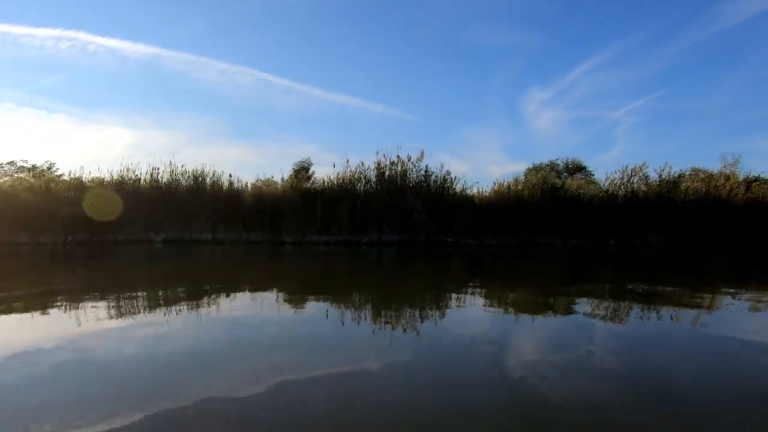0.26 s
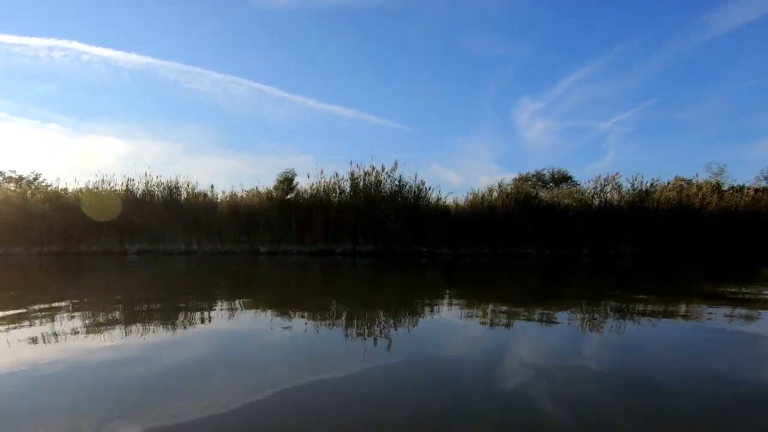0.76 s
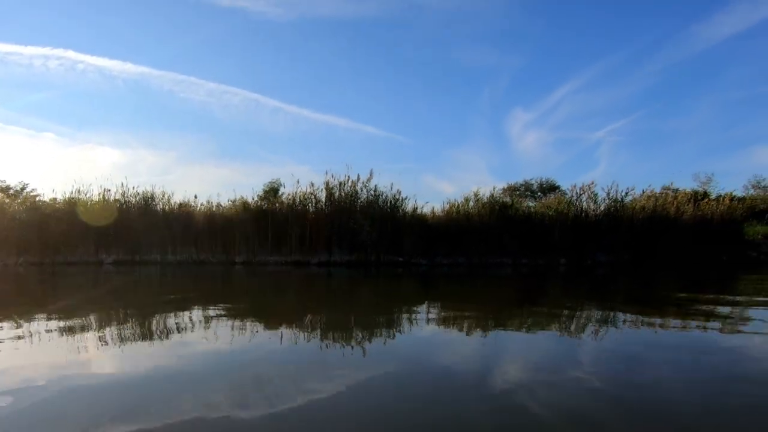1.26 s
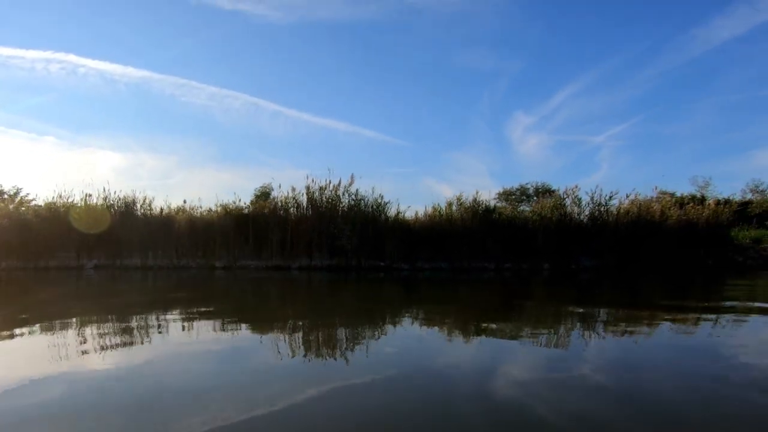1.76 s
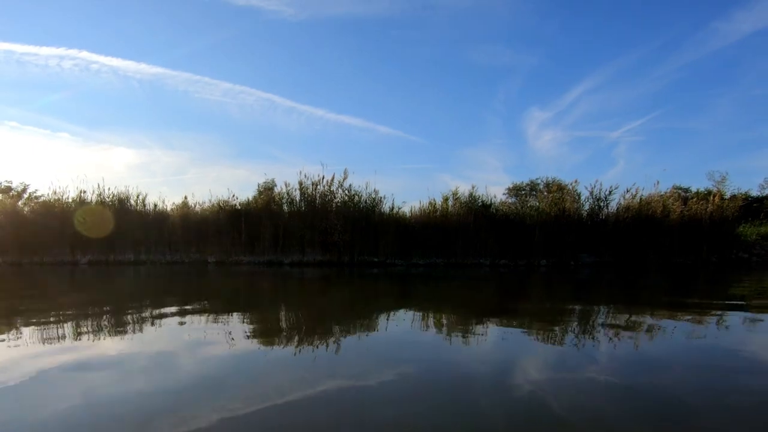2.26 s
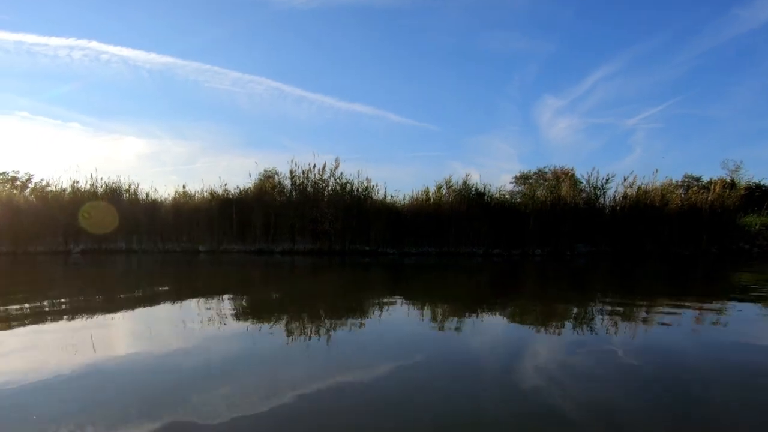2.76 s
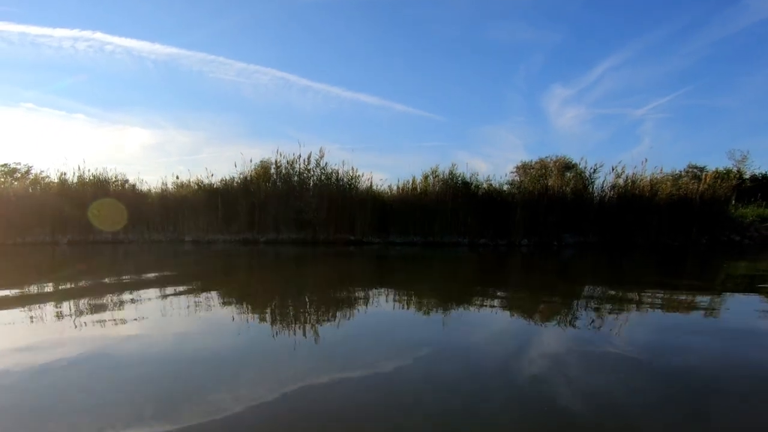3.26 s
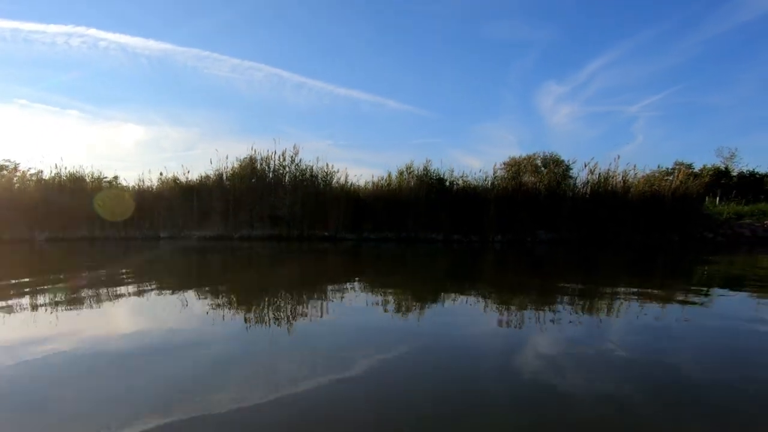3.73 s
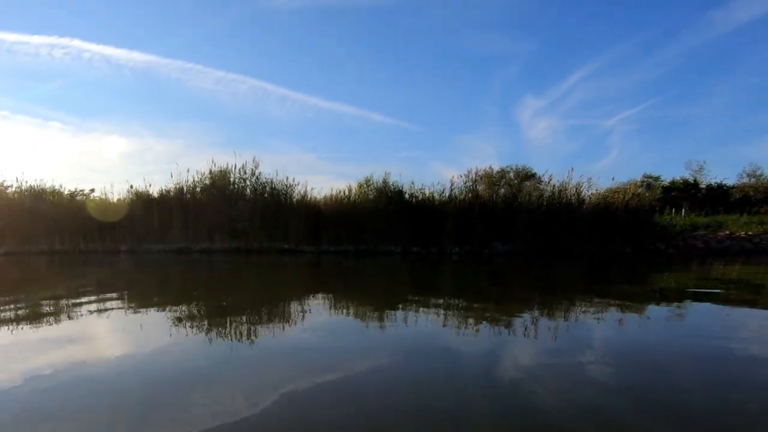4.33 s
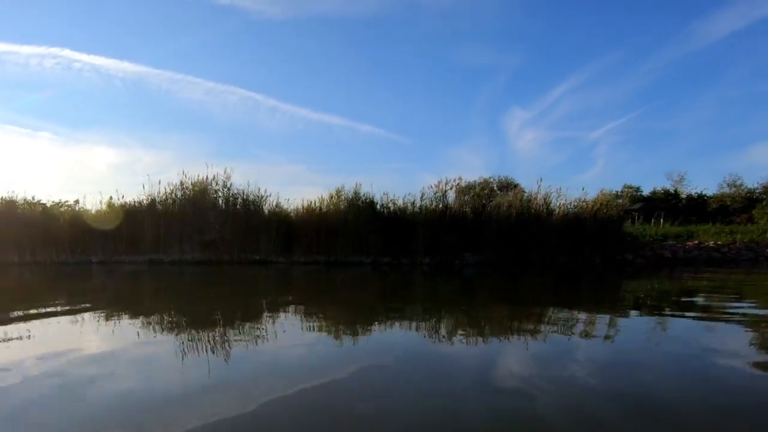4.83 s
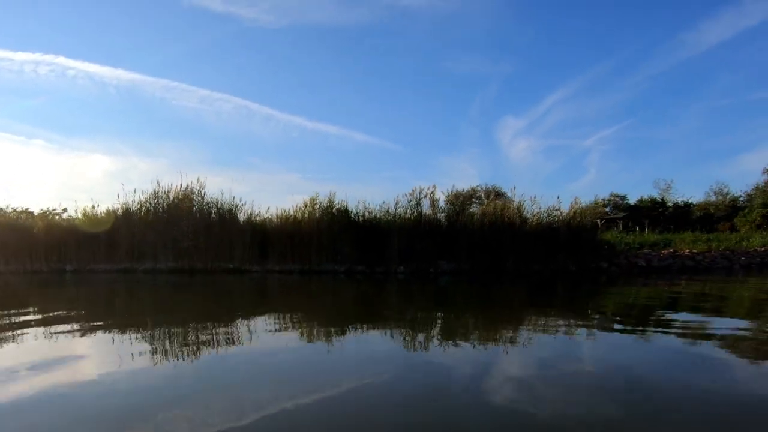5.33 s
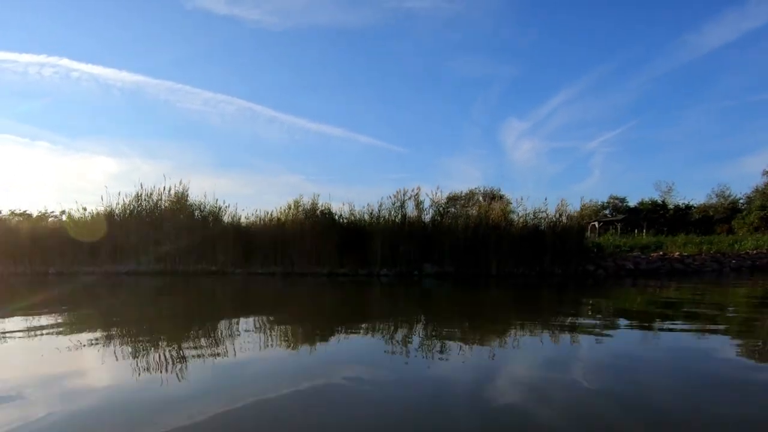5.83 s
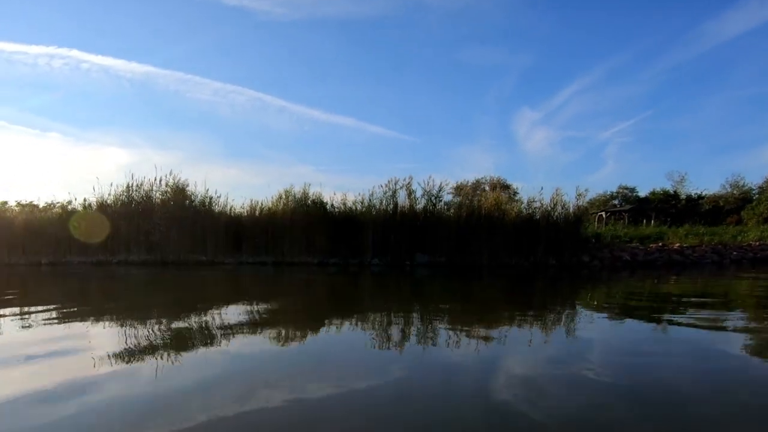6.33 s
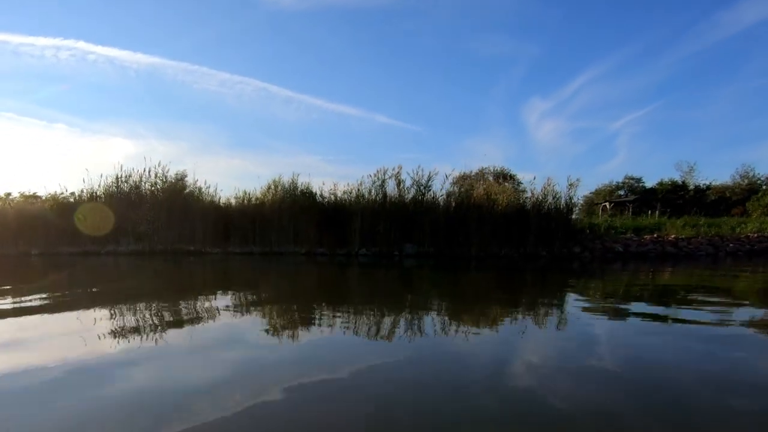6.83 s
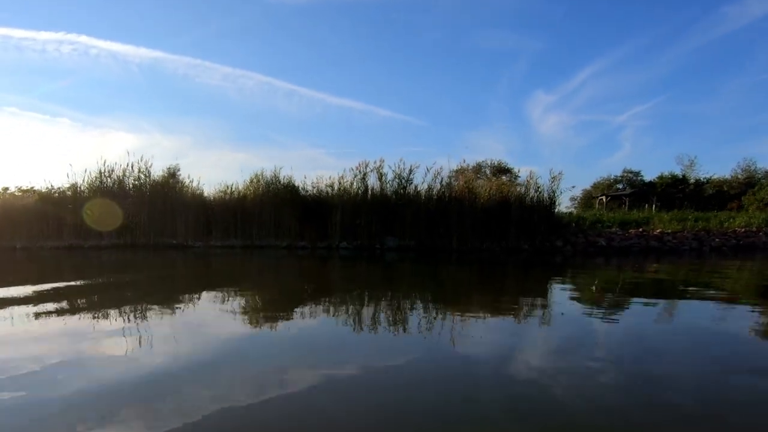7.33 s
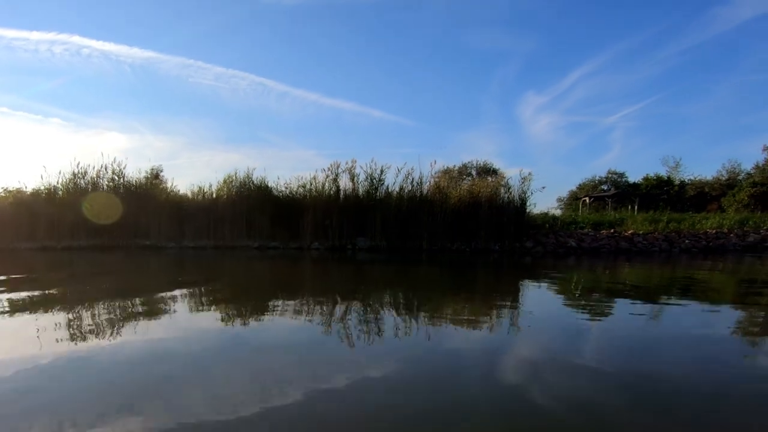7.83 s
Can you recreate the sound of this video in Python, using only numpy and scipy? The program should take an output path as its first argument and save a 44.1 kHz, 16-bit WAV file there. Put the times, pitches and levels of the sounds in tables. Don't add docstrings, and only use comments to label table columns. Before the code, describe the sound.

Close paddle strokes on a quiet lake: plops, ringing bubbles and fine spray, one hard slap late, low wind buffeting and faint engine throb beneath.

```python
import sys
import numpy as np
from scipy import signal
from scipy.fft import rfft, irfft, next_fast_len
from scipy.io import wavfile
from scipy.ndimage import uniform_filter1d, map_coordinates

SR = 44100
rng = np.random.default_rng(int(sys.argv[2]) if len(sys.argv) > 2 else 0)


def volts_from_decibels(level):
    exponent = np.asarray(level, float) / 20
    return 10 ** exponent


def file_out(sig):
    cols = np.atleast_2d(sig).T
    lim = np.clip(cols, -1, 1)
    pcm = np.round(lim * 32767).astype(np.int16)
    wavfile.write(sys.argv[1], SR, pcm)


N = 356769

# peak_s, peak_db, rise_s (per 20 dB), fall_s (per 20 dB)
STROKES = [(0, -55.5, .1, 1.28), (.34, -58.5, 0.02, -0.32), (1.53, -59, 0.63, 0.38), (1.99, -58, 0, 0.5),
           (2.2, -54.5, 0.36, 0.26), (3.11, -65.5, -0.22, 1.23), (3.63, -58.5, 0.12, 1.9),
           (4.02, -53, 0.6, 0.33), (4.37, -68, -21, 0.5), (4.78, -63.5, 0.39, 0.64),
           (5.15, -57, -0.02, 0.05), (5.22, -52, 0.25, 0.17), (5.33, -58, 0.07, 0.16),
           (5.89, -63, 0.43, 0.18), (6.04, -53.5, 0.59, 0.38), (6.41, -61, 0.2, 0.3),
           (6.65, -65.5, 0.2, 0.35), (6.78, -60, 0.26, 0.34), (7.24, -60, 0.05, 0.26), (7.89, -56, 1, 0.47)]
# pitch_hz, level_db (per Hz)
SWISH_COLOUR = [(300, 3.5), (700, -10.5), (1300, 5.5), (2000, -3), (3400, -19.5), (8000, -22), (10500, -46),
                (15000, -56)]
# start_s, peak_db, fade_s (by 60 dB), brightness_db (per octave), left_right_db
SPLATS = [(0.453, -38, 0.21, 0, 1.5), (0.653, -48.5, 0.11, -3.5, 21), (1.05, -38.5, 0.12, 0.5, 9),
          (1.466, -37.5, 0.13, -15, 3), (1.971, -35.5, 0.25, -6, -2.5), (2.719, -58.5, 0.36, 9, 7),
          (3.373, -31.5, 0.076, -6, 2), (3.51, -35, 0.11, -6, 0), (3.934, -30.5, 0.059, -13, 1),
          (4.005, -31, 0.17, -18, 5), (4.783, -43, 0.083, -3.5, 24), (5.127, -45, 0.32, -0.5, 5),
          (5.197, -42.5, 0.24, -3.5, 10), (5.333, -41, 0.19, -2, 0), (5.729, -41.5, 0.17, 8, -1),
          (5.83, -43, 0.095, -3, 20.5), (6.751, -17, 0.095, -3, 0.5), (7.32, -32.5, 0.026, -23, 1),
          (7.496, -36.5, 0.18, -5.5, -1)]
# pitch_hz, level_db (per Hz)
SPLAT_COLOUR = [(200, -0.5), (600, 6), (1500, 11.5), (2500, 6), (5000, -5.5), (9000, -9.5), (11000, -55),
                (15000, -56)]
# start_s, peak_db, pitch_hz, left_right_db
BUBBLES = [(0.029, -35, 2060, -15.5), (0.069, -42, 1825, -18.5), (.072, -34.5, 717, -9),
           (3.935, -39.5, 2650, 18), (0.449, -35, 1297, -2), (1.665, -36.5, 1417, -15),
           (1.679, -35.5, 1460, -12), (2.139, -22, 1322, -6.5), (2.309, -42.5, 1370, 17),
           (3.132, -45, 1417, 15), (3.498, -38, 1230, 0), (3.834, -39, 1570, -1), (3.934, -39.5, 957, 13),
           (3.934, -38, 1510, 18), (4.004, -31.5, 1540, 14), (4.034, -41, 1250, -12),
           (4.389, -34.5, 1400, -2), (5.219, -34, 1056, 3), (5.247, -33, 1525, -3),
           (5.766, -31.5, 1110, -3), (5.984, -34, 1050, 19), (6.047, -31.5, 2210, 26),
           (6.077, -37.5, 1310, 19), (6.211, -37, 1366, 8), (6.764, -32, 1327, 10), (7.752, -41, 1240, -16),
           (7.799, -33, 1415, -4), (1.699, -45, 3070, 4)]
# start_s, peak_db, pitch_hz, left_right_db
GULPS = [
    (.044, -43, 409, 13),
    (1.463, -35, 370, 0.5),
    (2.158, -39, 538, 2.5),
    (3.373, -39, 278, -1),
    (3.996, -33.5, 313, 1),
    (3.998, -39.5, 712, 22),
    (4.786, -36, 479, 1),
    (6.162, -45, 713, -5),
    (7.227, -37.5, 468, 10),
    (7.672, -38, 698, 6),
]
# start_s, peak_db, pitch_hz
DRIPS = [(0.522, -45, 2450), (.542, -45.5, 2270), (0.745, -51.5, 2430), (0.815, -45.5, 1310),
         (0.941, -46, 980), (1.511, -47, 1235), (1.762, -48, 1464), (1.92, -47, 1030), (2.957, -53.5, 2600),
         (4.888, -50.5, 2270), (3.735, -44, 3230), (3.816, -43.5, 1690), (4.183, -54, 1600),
         (4.182, -34, 2250), (4.341, -39, 2260), (4.356, -34, 1920), (4.948, -46, 2420), (5.622, -47, 1920),
         (5.649, -48, 1520), (6.162, -47.5, 2800), (6.244, -45.5, 2040), (6.387, -44, 1750),
         (6.448, -45, 2210), (7.409, -46, 1940), (7.83, -51, 1460), (4.837, -52, 2160)]
# start_s, peak_db, pitch_hz
TRICKLE = [(.078, -40, 1470), (.545, -38.5, 1410), (.585, -44, 650), (4.787, -38.5, 694), (.915, -49, 965),
           (.918, -46, 1530), (1.518, -50, 1850), (1.57, -44, 1730), (2.763, -59, 1680),
           (3.292, -41.5, 1040), (3.495, -44, 2050), (3.838, -43, 900), (6.653, -45, 1550),
           (5.765, -41.5, 810), (5.695, -48, 400), (5.828, -36, 1560), (7.333, -46, 1244), (7.42, -48, 767),
           (7.701, -37.5, 1240), (7.819, -42, 1780)]
# start_s, peak_db, pitch_hz, left_right_db
TICKS = [(0.171, -44.5, 4650, 2.5), (0.266, -45.5, 4860, 4), (0.2993, -45, 8540, 0),
         (0.347, -39.5, 7040, 4), (0.378, -50, 4200, 16), (0.5566, -52.5, 6400, 8), (1.4142, -49, 5400, -3),
         (2.1316, -50.5, 5410, 14), (2.2184, -45, 5530, 6), (2.4562, -50.5, 5160, 9),
         (3.057, -47.5, 4230, 0.5), (3.918, -49, 4650, -8), (3.951, -48, 6100, -16), (4.0206, -45, 4640, 7),
         (4.0512, -51, 4650, 3), (4.132, -44.5, 6760, 5), (4.2864, -48, 5800, 5), (4.6417, -56, 5270, 6),
         (4.7423, -52, 5290, 6), (5.0973, -47, 5140, 3), (5.683, -46, 4320, -2), (5.8007, -46, 4350, 5),
         (5.82, -41, 5530, -5), (5.9723, -55, 4470, 3), (7.695, -53, 4320, -3.5), (7.7195, -48, 7630, -0.5),
         (7.8424, -46, 4200, 8), (7.874, -48, 8690, 3.0)]
# pitch_hz, level_db (per Hz)
SPRAY_COLOUR = [(800, -5.5), (2500, -7), (6000, -11.5), (9500, -9.5), (11000, -16), (15000, -21)]
# start_s, peak_db, pitch_hz, left_right_db
FAT_DROPS = [
    (2.2034, -23, 2200, 27),
    (2.716, -37.5, 3470, 19),
    (3.133, -43, 1900, 24),
    (6.047, -22.5, 2420, 27.5),
    (6.0752, -27, 2690, 23),
    (7.902, -28.5, 2850, 24),
]
# start_s, peak_db, pitch_hz
PINGS = [(0.3306, -54, 3590), (0.35, -42, 3060), (0.4923, -49, 2410), (0.5094, -50.5, 2700),
         (0.6315, -49, 3000), (1.0216, -52, 2730), (1.056, -41, 3260), (1.2974, -50, 3000),
         (1.31, -48, 3400), (1.3319, -46.5, 2480), (1.4017, -45, 2820), (1.4361, -49, 2600),
         (2.2503, -36.5, 3070), (2.3885, -47, 3110), (2.5192, -53, 2690), (3.2066, -51, 2600),
         (3.9494, -40, 2800), (3.9848, -49, 2890), (4.0277, -48, 2630), (4.0397, -37, 2730),
         (4.0512, -34, 2530), (4.12, -38, 2680), (4.6778, -45.5, 3400), (5.1098, -48, 2880),
         (5.1277, -40, 2800), (5.139, -46, 2870), (5.9823, -38.5, 3270), (6.3455, -58, 3230),
         (6.668, -52, 2800), (6.7364, -55, 2450), (7.0648, -49, 3160), (7.0988, -49, 2460),
         (7.856, -49, 3000), (7.931, -44, 3220), (7.9583, -45, 3060), (8.0142, -47, 3110),
         (1.054, -39, 1390), (3.095, -47, 1460), (3.375, -44, 1960), (.918, -57, 2460)]
# start_s, peak_db, pitch_hz, left_right_db
POPS = [(0.3137, -43, 1570, 12), (0.3484, -42.5, 1780, 16), (0.379, -43.5, 1950, 14),
        (0.4302, -40, 2400, -7.5), (0.6579, -40, 1960, -10), (2.2027, -31.5, 1250, 19),
        (5.139, -51, 1430, -2), (7.669, -39, 2230, 0), (7.933, -44, 1300, 7), (7.998, -42, 2070, 7),
        (2.2342, -36.5, 1680, 12), (3.318, -50.5, 1510, -12), (3.4266, -49, 1860, 8),
        (3.478, -48.5, 2580, -17), (7.422, -48, 2780, -14), (4.132, -43, 1910, 16), (5.2954, -43, 2280, 4),
        (5.7014, -44, 2010, -9), (5.904, -44.5, 1780, 16)]
# start_s, peak_db, pitch_hz
FLECKS = [(0.2124, -63, 4730), (0.5003, -60, 4560), (1.1777, -58, 4460), (2.2458, -59, 4230),
          (2.3027, -49, 4990), (2.4165, -57, 5550), (2.7077, -44, 4270), (3.201, -50, 4730),
          (3.5813, -50, 4770), (3.6177, -51, 4700), (3.6416, -53, 4770), (3.6905, -51, 4730),
          (4.119, -47, 6700), (4.2055, -54, 6700), (4.2393, -56, 5050), (4.451, -50, 5730),
          (5.0814, -58, 5100), (5.2064, -47.5, 4970), (5.2245, -51, 5760), (5.2984, -49, 5430),
          (6.0102, -55, 5920), (6.0438, -30.5, 5300), (6.202, -58, 5620), (6.214, -52, 5200),
          (6.31, -49, 4330), (6.3929, -49.5, 9810), (6.7358, -54, 5000), (6.8805, -55, 4660),
          (6.9544, -53, 4740), (7.2799, -54.5, 4140), (7.432, -51, 4380), (7.442, -51, 4960),
          (7.5068, -52, 4230), (7.5194, -48, 4200), (7.5847, -50, 4870), (7.657, -44, 4150),
          (7.7687, -46, 8800), (7.812, -56, 5300), (7.847, -60, 4230), (7.9023, -35.5, 8600),
          (7.9244, -47, 5370), (7.938, -49, 4600), (7.975, -53, 5040), (7.9942, -46.5, 5000)]
# start_s, peak_db, pitch_hz, end_pitch_hz, length_s
CAVITIES = [
    (.08, -44.5, 785, 1110, 0.024),
    (1.91, -56, 993, 1510, 0.022),
    (2.151, -48, 1830, 2690, 0.035),
    (2.235, -51, 980, 1260, 0.039),
    (2.319, -51.5, 1380, 2400, 0.026),
    (3.101, -56, 1440, 2730, 0.025),
    (5.162, -58, 610, 1300, 0.0418),
    (5.164, -58, 1710, 2700, 0.032),
    (5.225, -56, 2520, 3440, 0.014),
    (7.808, -49, 1490, 1914, 0.042),
]
# delay_s, level_db
ECHOES = [
    (.0011, -21),
    (.0027, -17.5),
    (.0052, -15),
]
# peak_s, peak_db, swell_s (per 20 dB, sign unused), left_right_db
GUSTS = [(0.059, -21.5, 0.29, 13.5), (.18, -22, -0.1, 8), (.4, -35.5, 1.1, 6), (.97, -36.5, 0, -1),
         (1.68, -23, 0.36, -6.5), (1.78, -26.5, .1, -3), (2.03, -27.5, -0.17, -2.5), (2.299, -27, 0.27, -6),
         (2.62, -38, 1, 1.5), (3.05, -32, -0.06, -12), (3.31, -24, 0.47, -1.5), (3.47, -31.5, 0.3, 2),
         (3.77, -37, -0.03, 17), (4.25, -37.5, 0.93, 8.5), (4.5, -34, 0.55, 9), (4.74, -24, 0.19, 6),
         (4.9, -40, -2, 11), (5.16, -32.5, 0.5, 0), (5.48, -28, 0.62, 1.5), (5.78, -27.5, .25, -0.5),
         (5.98, -28.5, -0.18, 8), (6.15, -39.5, -0.3, 0), (6.229, -36, 0.27, 12),
         (6.441, -26.5, 0.1152, -4), (7.05, -40.5, 1.3, -4.5), (7.32, -33, 0.26, -1), (7.6, -33, 0.55, 2),
         (7.849, -27, 0.21, 9), (8.0, -56, 2, -2)]
# pitch_hz, level_db (per Hz)
WIND_COLOUR = [(15, -13), (35, 3.5), (70, -0.5), (120, -9.5), (250, -25), (500, -42), (1000, -56.5),
               (3000, -110)]
# time_s, level_db
BREEZE = [(0, -83), (.34, -71.5), (.77, -90), (1.53, -76.5), (2.38, -78.5), (2.65, -70.5), (2.85, -93.5),
          (3.11, -87), (3.63, -75), (4.02, -75.5), (4.37, -92), (4.7, -76.5), (5.04, -93), (5.22, -76),
          (6.04, -78), (6.5, -79.5), (7.35, -81), (7.6, -80), (7.92, -69.5), (8.09, -78.5)]
# pitch_hz, level_db (per Hz)
REED_COLOUR = [(1500, -6), (2600, 1), (4500, -3), (6800, -7), (8000, -1), (9200, 0), (10200, -9),
               (13000, -22)]
# start_s, end_s, pitch_hz, end_pitch_hz, level_db
WHISTLES = [
    (1.51, 1.63, 3000, 4700, -73),
    (2.925, 3.03, 2900, 4650, -72),
    (4.97, 5.08, 2900, 4000, -76),
]
# time_s, engine_db, roar_db
FAR = [
    (0, -42.5, -49),
    (2.5, -47.5, -49.5),
    (5, -53.5, -49.5),
    (6.7, -56, -49),
    (8.09, -50, -47.5),
]
# multiple (of the base pitch), level_db
ENGINE = [(6, 0), (7, -9), (8, -9), (9, -3), (10, -11), (11, -11), (12, -12), (14, -13), (15, -11),
          (17, -12), (19, -13), (20, -12), (21, -15), (22, -15)]
# pitch_hz, level_db (per Hz)
ROAR_COLOUR = [(60, -7.5), (250, -3.5), (500, -11.5), (800, -13), (1200, -18.5), (1650, -37), (2100, -47.5),
               (11000, -55)]
# pitch_hz, level_db
MIC = [(3200, 0.5), (4100, 0.5), (5000, 0.5), (9500, -1.5), (11000, -4.5), (16000, -19)]


def swish():
    sheet = patchy(rush(SWISH_COLOUR, 0.065, 0.0003), depth_db=5.0)
    fizz, t = np.zeros((2, N + SR)), np.arange(900) / SR
    u, *rest = rng.random((5, 2600))
    for s, pitch, size, pan, life in zip(crowded(u, 0.7), *rest):
        hz = 750 * 5.5 ** (pitch ** 1.5)
        cycles = 5 + 45 * life ** 2.6 * (hz < 2300)
        gain = volts_from_decibels(-4.6 * np.log(size + 0.2) - 0.5 * np.log2(hz / 900))
        add(fizz, s, gain * bubble(hz, cycles / hz, 0.16, t), 18 * (pan - 0.45), 0.0003)
    return total(swells(STROKES)) * (volts_from_decibels(4.0) * sheet + unit(fizz[:, :N]))


def splats():
    out, t, rise_s = np.zeros((2, N + SR)), np.arange(SR // 6) / SR, 0.0045
    for s, db, fade_s, tilt_db, pan_db in SPLATS:
        own = rng.standard_normal((3, len(t)))
        pair = np.array([own[0], np.roll(own[0], shift=12)]) + 2.0 * own[1:]
        tilt_db = np.clip(tilt_db, -6, 8)
        pair = filtered(pair, lambda f: volts_from_decibels(along(SPLAT_COLOUR, f) + tilt_db * np.log2(f / 1500 + 0.2)))
        pair = unit(pair)
        low = filtered(pair, lambda f: 1 / (1 + (f / 2800) ** 4))
        fall = volts_from_decibels(-60 * np.maximum(t - rise_s, 0) / max(fade_s, 0.01))
        rough = volts_from_decibels(4.3 * unit(uniform_filter1d(rng.standard_normal(len(t)), size=80)))
        burst = np.minimum(t / rise_s, 1) ** 2 * rough * (low * fall + (pair - low) * fall ** 2.06)
        out[:, round((s - 0.002) * SR):][:, :len(t)] += volts_from_decibels(db - 7.5) * sides(pan_db)[:, None] * burst
    return out[:, :N]


def drips():
    out, t = np.zeros((2, N + SR)), np.arange(SR // 8) / SR
    events = BUBBLES + GULPS + panned(DRIPS, -13) + panned(TRICKLE, 8)
    for s, db, hz, pan_db in events:
        life, rise, lead_s = rng.uniform([0.7, 0.02, 0.00024], [1.15, 0.14, 0.0003])
        fade_s = life * 0.05 * (1500 / hz) ** 0.73
        add(out, s - 0.0007, volts_from_decibels(db + 3.0) * bubble(hz, fade_s, rise, t), pan_db, lead_s)
    return out[:, :N]


def spray():
    out, patter, t = np.zeros((2, N + SR)), np.zeros((2, N + SR)), np.arange(SR // 40) / SR
    thrown = [(s, db - 7.5 + 0.63 * min(tilt_db, 0), None, pan_db) for s, db, _, tilt_db, pan_db in SPLATS]
    flung = [(s, db - 26, None, pan_db / 2) for s, db, _, pan_db in FAT_DROPS]
    for s, db, own_hz, pan_db in TICKS + thrown + flung:
        hz, fade_s, lead_s = rng.uniform([4200, 0.006, 0.00007], [9000, 0.018, 0.0003])
        gain = volts_from_decibels(db - (2.0 if own_hz is None else -3.5))
        add(out, s - 0.0005, gain * crack(own_hz or hz, fade_s, t), pan_db, lead_s)
    u, *rest = rng.random((4, 330))
    for s, pitch, size, pan in zip(crowded(u, 0.62), *rest):
        tick = crack(3000 + 7000 * pitch, 0.0061, t)
        add(patter, s, volts_from_decibels(-3.5 * np.log(size + 0.06)) * tick, 16 * (pan - 0.35), 0.0002)
    return out[:, :N] + volts_from_decibels(-18) * total(swells(STROKES)) * unit(patter[:, :N])


def fat_drops():
    out, t = np.zeros((2, N + SR)), np.arange(SR // 50) / SR
    for s, db, hz, pan_db in FAT_DROPS:
        width_hz = 700 * (3000 / hz) ** 2
        click = 0.12 * rng.standard_normal(len(t)) + (t == t[30])
        push = filtered(click, lambda f: 1 / (1 + ((f - hz) / width_hz) ** 4))
        push = push * volts_from_decibels(-60 * t / 0.0054) * (1 - np.exp(-t / 0.00021))
        add(out, s - 0.0005, volts_from_decibels(db - 6.5) * push / np.abs(push).max(), pan_db, 0.0002)
    return out[:, :N]


def droplets():
    out, t = np.zeros((2, N + SR)), np.arange(SR // 30) / SR
    small, fine = panned(PINGS, 11) + POPS, panned(FLECKS, -2)
    for rows, cycles, speck_db in ((small, 36, -19), (fine, 42, -8)):
        for s, db, hz, pan_db in rows:
            life, rise, lead_s = rng.uniform([0.7, 0.0, 0.00012], [1.3, 0.15, 0.0003])
            ring = bubble(hz, life * cycles / hz, rise, t)
            speck = volts_from_decibels(speck_db) * crack(hz, 0.018, t)
            add(out, s - 0.0007, volts_from_decibels(db + 5.0) * (ring + speck), pan_db, lead_s)
    return out[:, :N]


def cavities():
    out = np.zeros((2, N + SR))
    for s, db, hz, end_hz, length_s in CAVITIES:
        tone = slide(length_s, hz, end_hz, 0.37)
        rough = volts_from_decibels(3.5 * unit(uniform_filter1d(rng.standard_normal(SR // 10), size=120)))[:len(tone)]
        add(out, s, volts_from_decibels(db) * rough * tone, 8.5, 0.00025)
    return out[:, :N]


def wind():
    s, db, width, pan_db = np.transpose(GUSTS)
    rows = np.transpose([s, db, width, width])
    gusts = [total(gain[:, None] * swells(rows)) for gain in sides(pan_db)]
    eddies = volts_from_decibels(4.55 * np.array([wobble(24), wobble(24)])) * rush(WIND_COLOUR, 0.14)
    eddies = eddies / np.sqrt(np.abs(uniform_filter1d(eddies ** 2, size=3000)) + 0.018)
    return gusts * eddies


def reeds():
    breeze_db, = curves(BREEZE)
    return volts_from_decibels(breeze_db + 4.5 + 1.7 * wobble(12)) * rush(REED_COLOUR, 0.037, 0.0001)


def bird():
    out = np.zeros((2, N + SR))
    for s, end_s, hz, end_hz, db in WHISTLES:
        add(out, s, volts_from_decibels(db) * slide(end_s - s, hz, end_hz, 0.39), 1, 0)
    return out[:, :N] * volts_from_decibels(4 * wobble(45) - 10)


def distance():
    engine_db, roar_db = curves(FAR)
    firing_hz = 17.0 * (1 + 0.0015 * wobble(1.29))
    turn = 2 * np.pi * np.cumsum(firing_hz) / SR
    engine = 0
    for k, db in ENGINE:
        phase = rng.uniform(0, 2 * np.pi) + rng.normal(0, 0.6, (2, 1))
        engine = engine + volts_from_decibels(db + 2.5 * wobble(9)) * np.sin(k * turn + phase)
    roar = volts_from_decibels(roar_db + 0.39 * wobble(1.26)) * rush(ROAR_COLOUR, 1.0, 0.00023, apart_hz=151)
    return volts_from_decibels(engine_db) * unit(engine) + roar


def bubble(hz, fade_s, rise, t):
    fade_s = np.maximum(fade_s, 0.004)
    shape = 1 + 0.35 * np.cos(2 * np.pi * 0.07 * hz * t)
    envelope = volts_from_decibels(-60 * t / fade_s) * (1 - np.exp(-t / 0.0015))
    return shape * envelope * np.sin(2 * np.pi * hz * (t + rise * t * t / fade_s))


def crack(hz, fade_s, t):
    colour = lambda f: volts_from_decibels(along(SPRAY_COLOUR, f)) * (1 + 3.4 / (1 + ((f - hz) / 700) ** 2))
    burst = unit(filtered(rng.standard_normal(len(t)), colour))
    return burst * volts_from_decibels(-60 * t / fade_s) * (1 - np.exp(-t / 0.00033))


def slide(length_s, hz, end_hz, power):
    u = np.linspace(0, 1, round(length_s * SR))
    return np.sin(np.pi * u) ** power * np.sin(2 * np.pi * np.cumsum(hz + (end_hz - hz) * u) / SR)


def rush(spectrum, alike, lead_s=0., apart_hz=0.):
    own, shared = rng.standard_normal((2, N)), rng.standard_normal(N)
    share = lambda hz: np.clip(alike, 0, 1) * (hz + 1) / (hz + 1 + abs(apart_hz))
    colour = lambda hz: volts_from_decibels(along(spectrum, hz))
    shift = lambda hz: np.exp(1j * np.pi * hz * lead_s * np.array([[1], [-1]]))
    shared = filtered(shared, lambda hz: np.sqrt(share(hz)) * colour(hz) * shift(hz))
    return unit(shared + filtered(own, lambda hz: np.sqrt(1 - share(hz)) * colour(hz)))


def patchy(x, depth_db):
    z = signal.stft(x, nperseg=256)[2]
    field = uniform_filter1d(rng.standard_normal(z.shape[1:]), size=4, axis=0)
    field = uniform_filter1d(field, size=4, axis=1)
    return unit(signal.istft(z * volts_from_decibels(depth_db * unit(field)), nperseg=256)[1][:, :N])


def swells(rows):
    s, db, rise, fall = np.transpose(rows)[:4, :, None]
    t = np.arange(0, N + 64, 64) / SR - s
    return volts_from_decibels(db - 20 * np.maximum(-t / np.abs(rise), t / np.abs(fall)))


def total(gains):
    return map_coordinates(np.sqrt((gains ** 2).sum(axis=0)), [np.arange(N) / 64], order=1)


def crowded(u, power):
    share = np.cumsum(total(swells(STROKES))[::64] ** power)
    return np.interp(u, share / share[-1], np.linspace(0, N / SR, len(share)))


def wobble(rate):
    knots = rng.standard_normal(int(N * rate / SR) + 4)
    return map_coordinates(knots, [np.arange(N) * rate / SR])


def curves(rows):
    s, *cols = np.transpose(rows)
    return [np.interp(np.arange(N) / SR, s, c) for c in cols]


def along(points, hz):
    f, v = np.transpose(points)
    return np.interp(np.log(hz + 1), np.log(f + 1), v)


def filtered(x, response):
    m = next_fast_len(x.shape[-1] + 2048)
    return irfft(rfft(x, m) * response(np.fft.rfftfreq(m, 1 / SR)), m)[..., :x.shape[-1]]


def unit(x):
    return x / np.sqrt(np.mean(x ** 2) + 1e-20)


def sides(pan_db):
    return volts_from_decibels(np.array([pan_db / 2, -pan_db / 2]))


def panned(rows, pan_db):
    return [(*row, pan_db) for row in rows]


def add(out, s, sound, pan_db, lead_s):
    for side, gain, late in zip(out, sides(pan_db), (0, lead_s)):
        side[max(round((s + late) * SR), 0):][:len(sound)] += gain * sound


def scene():
    flutter = volts_from_decibels(4 * wobble(170))
    flutter = flutter / uniform_filter1d(flutter, size=900)
    near = drips() * flutter + spray() + fat_drops() + droplets() + cavities()
    stretch = np.array([[1], [1.23]])
    echoes = lambda f: 1 + sum(volts_from_decibels(db) * np.exp(-2j * np.pi * f * s * stretch) for s, db in ECHOES)
    return filtered(near, echoes) + swish() + splats() + wind() + reeds() + bird() + distance()


def low_pass(x):
    return signal.sosfilt(signal.butter(12, 15450, fs=SR, output="sos"), x)


def record(dry):
    mid, side = (dry[0] + dry[1]) / 2, (dry[0] - dry[1]) / 2
    centre_hz, width_hz = 1275, 130
    ring = lambda hz: 1j * hz * width_hz / (centre_hz ** 2 - hz * hz + 1j * hz * width_hz)
    side = filtered(side, lambda hz: 1 + 1.76 * ring(hz))
    pair = filtered(np.array([mid + side, mid - side]), lambda hz: volts_from_decibels(along(MIC, hz)))
    return low_pass(pair)


dry = scene()
out = record(dry)
file_out(out)
```